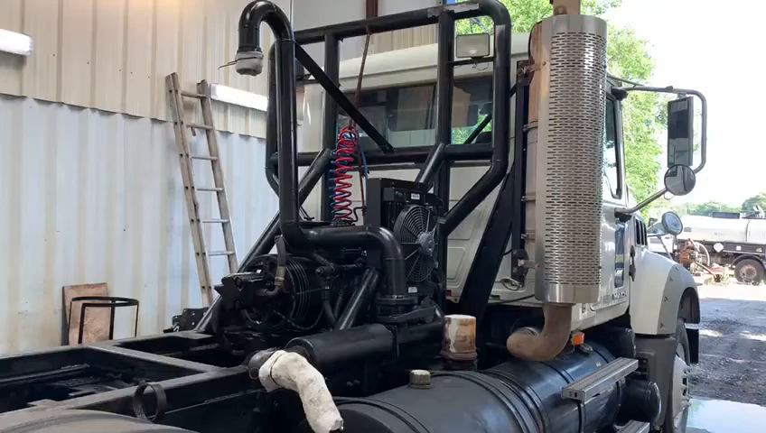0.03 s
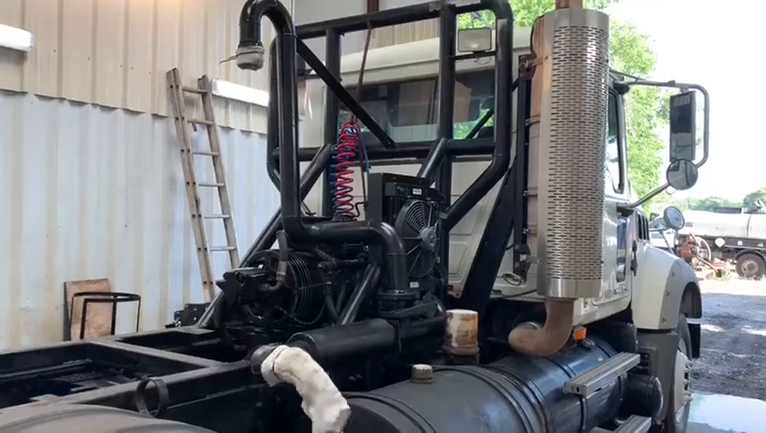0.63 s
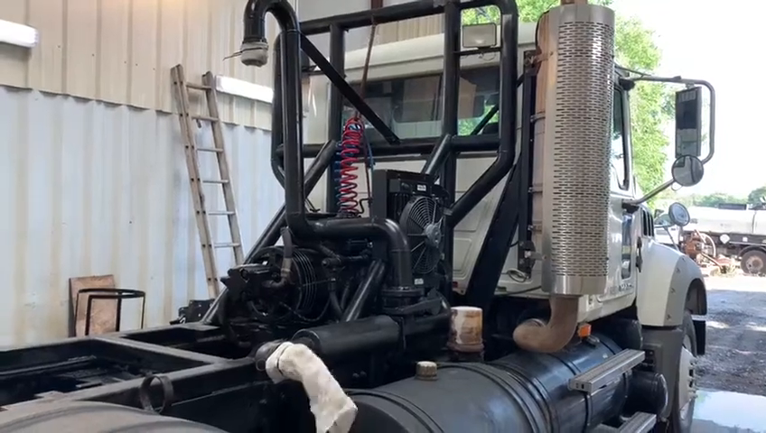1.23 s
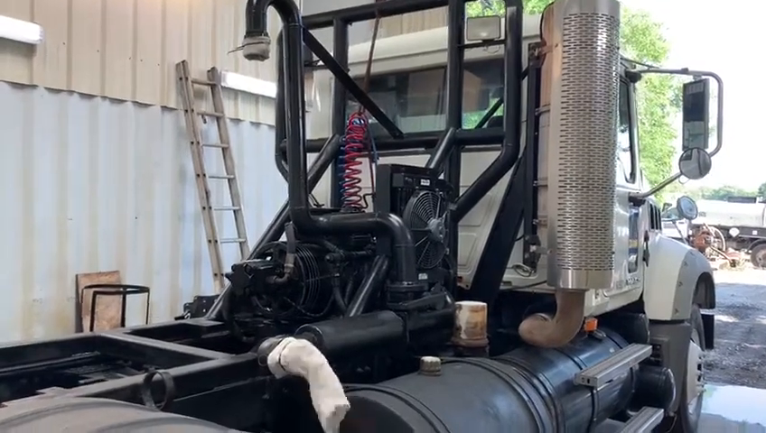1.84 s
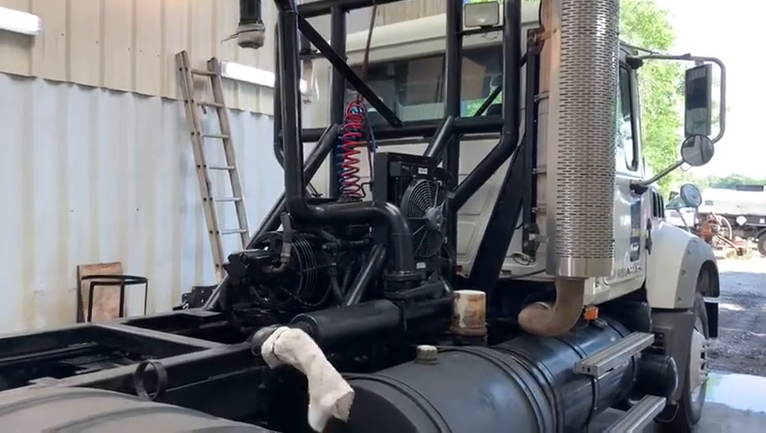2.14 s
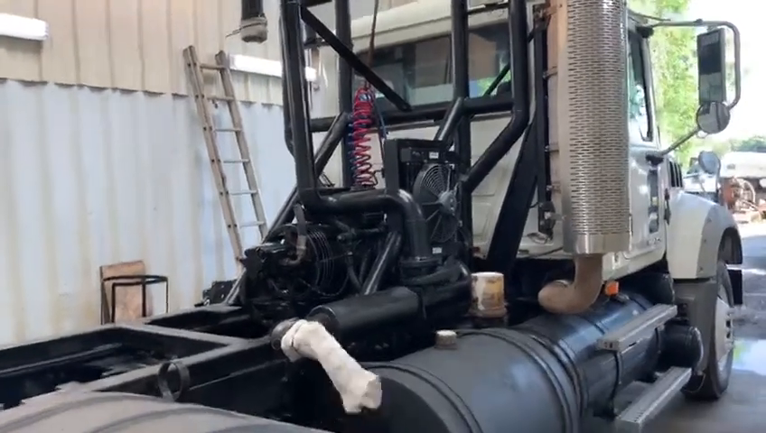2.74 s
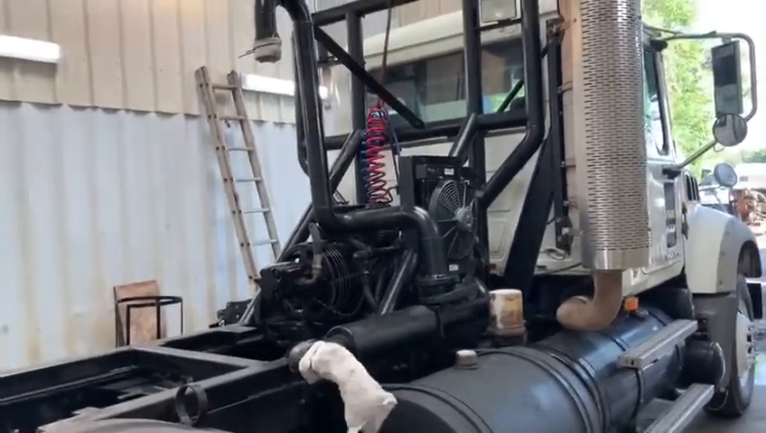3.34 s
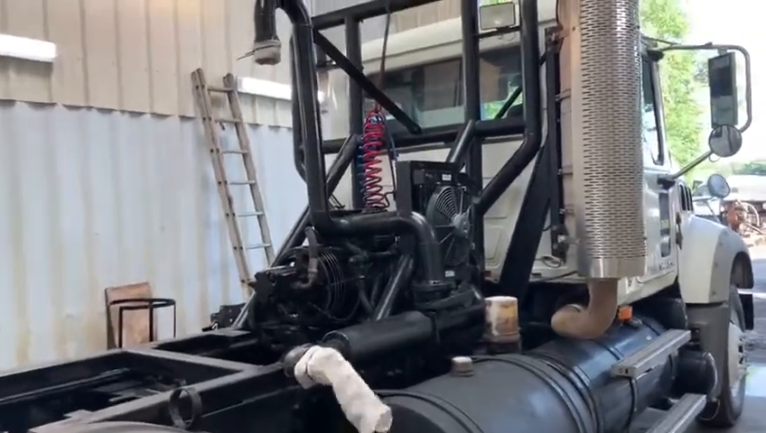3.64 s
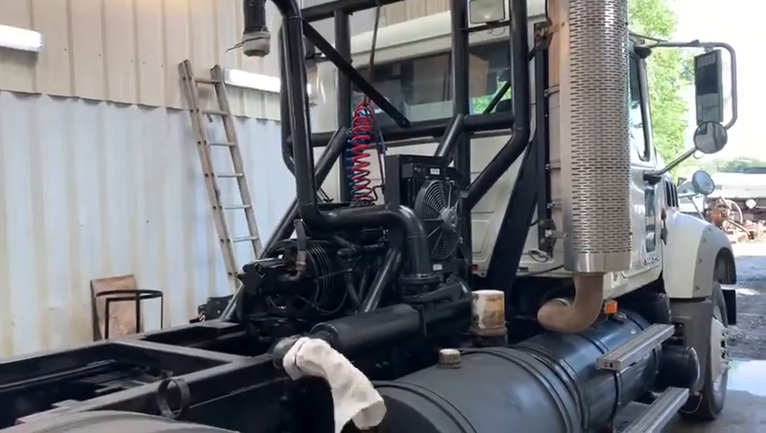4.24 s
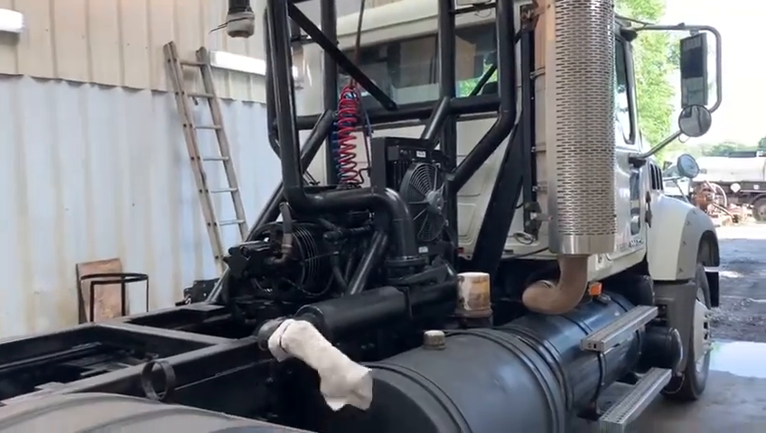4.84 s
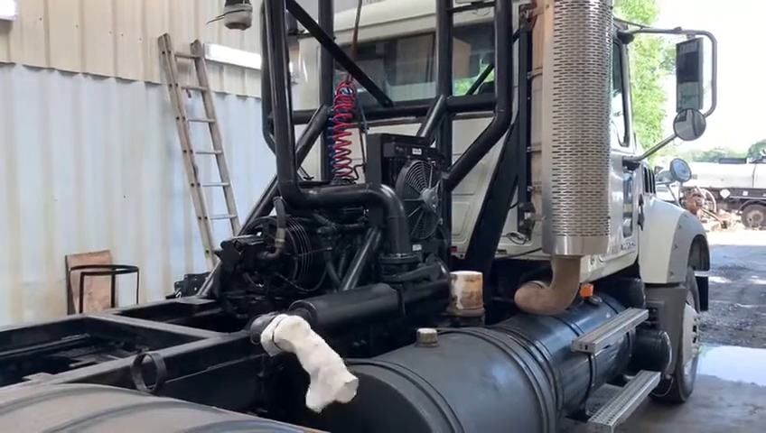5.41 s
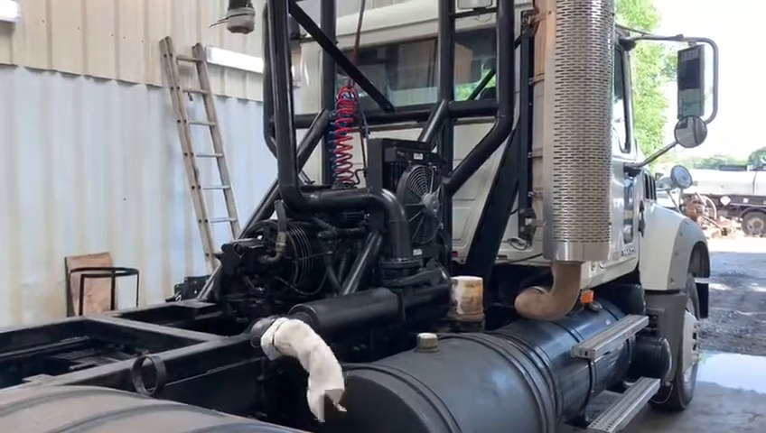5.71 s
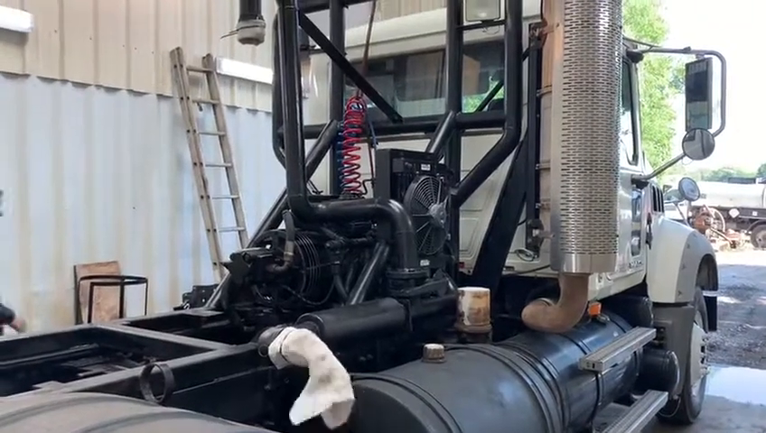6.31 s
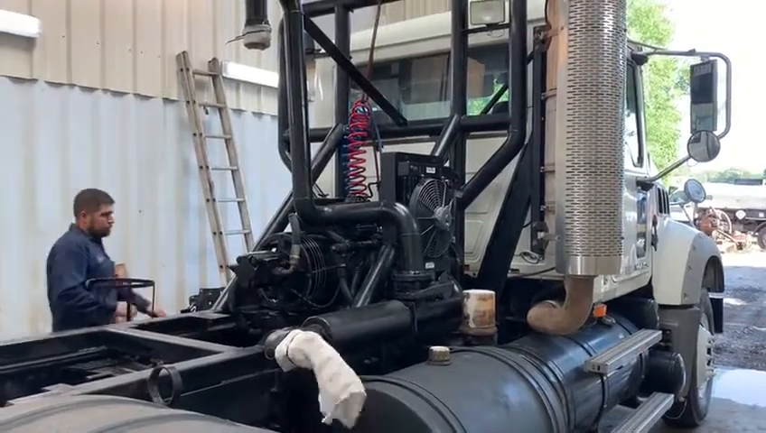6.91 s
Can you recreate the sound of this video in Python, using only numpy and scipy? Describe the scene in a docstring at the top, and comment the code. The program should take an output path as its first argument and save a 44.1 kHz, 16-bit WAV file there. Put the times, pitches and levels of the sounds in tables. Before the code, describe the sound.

A diesel engine runs fast and loud, driving a pump on a truck inside a metal-walled workshop. Its low exhaust drone wavers slightly, mixed with mechanical clatter and a steady hiss of rushing air. After about a second the drone changes colour as the load eases, and a thin high whistle winds up and holds. The load returns while the roar carries on, heard from nearby.

```python
"""A four-cylinder diesel near 2300 rpm drives a truck's vacuum pump in a metal-walled workshop.
From the start: exhaust drone, clatter and rushing air, the governor hunting about four times a second.
Near 1 s the load eases, the drone changes colour and a thin whistle winds up to hold near 6.45 kHz.
By 4 s the load is back. At 5.4 s the sound skips briefly, like a small glitch."""
import sys
import numpy as np
from scipy import signal
from scipy.fft import rfft, irfft, next_fast_len
from scipy.io import wavfile
from scipy.ndimage import uniform_filter1d, map_coordinates

SR = 44100
rng = np.random.default_rng(int(sys.argv[2]) if len(sys.argv) > 2 else 0)


def put_to_file(sound):
    """Save the sound as 16-bit audio at rate SR, in the file named by the first command-line argument."""
    columns = np.atleast_2d(sound).T  # one column per channel
    safe = np.clip(columns, -1, 1)
    whole_steps = np.round(safe * 32767)
    wavfile.write(sys.argv[1], SR, whole_steps.astype(np.int16))


N = 306936
TIME = np.arange(N) / SR

# Relative noise levels: time_s, clatter_db, air_db
NOISE_LEVELS = [(0.15, -33, -41.5), (1.0, -32, -41), (2.0, -31.5, -40.5), (3.0, -32, -40.5),
                (3.8, -32.5, -39.5), (4.8, -31.5, -39), (5.7, -31, -39.5), (6.4, -31.5, -39.5),
                (6.96, -30.5, -38.5)]


def amp(db):
    """Decibels to gain."""
    return 10 ** (np.asarray(db) / 20)


def unit(x):
    """x at rms 1."""
    return x / np.sqrt(np.mean(x ** 2) + 1e-20)


def along(points, hz):
    """Interpolate (freq_hz, value) rows on a log axis."""
    freqs_hz, values = np.transpose(points)
    return np.interp(np.log(hz + 1), np.log(freqs_hz + 1), values)


def curves(rows):
    """One per-sample curve for each column after time_s."""
    times_s, *columns = np.transpose(rows)
    return [np.interp(TIME, times_s, column) for column in columns]


def wobble(knots_per_s):
    """Smooth random curve."""
    return map_coordinates(rng.standard_normal(4096), [TIME * knots_per_s], mode="wrap")


def filtered(x, response):
    """Filter x by response(hz)."""
    size = next_fast_len(N + SR // 2)
    return irfft(rfft(x, size) * response(np.fft.rfftfreq(size, 1 / SR)), size)[..., :N]


def panned(x, pan_db):
    """Equal-power stereo, left louder by pan_db."""
    left, right = amp(pan_db / 2), amp(-pan_db / 2)
    return np.array([x * left, x * right]) / np.sqrt((left ** 2 + right ** 2) / 2)


def patchy_noise(patchy_db):
    """Two noises with random gain patches in time and frequency."""
    spectra = signal.stft(rng.standard_normal((2, N)), nperseg=512)[2]
    patches = uniform_filter1d(rng.standard_normal(spectra.shape[1:]), size=7, axis=0)
    patches = uniform_filter1d(patches, size=12, axis=1)
    return unit(signal.istft(spectra * amp(patchy_db * unit(patches)), nperseg=512)[1][:, :N])


def diffuse(pair, spectrum):
    """Two unrelated signals to a stereo field of rms 1, shaped by spectrum, rippled by near echoes."""
    # Left-right likeness: freq_hz, correlation
    likeness = [(40, .88), (250, .93), (500, .7), (900, .5), (1600, .3), (4500, .15), (5400, -.25),
                (7200, .4), (7900, .98), (8400, .7), (9300, -.99), (10200, -.99), (11100, .98)]
    # Echoes off the truck frame and near wall: delay_s, gain
    near_echoes = [(.0019, 0.14), (.0037, -0.12), (.0071, .14), (0.0123, 0.12)]

    def response(hz):
        width_rad = np.arccos(np.clip(along(likeness, hz), -1, 1)) / 2
        echoes = sum(gain * np.exp(-2j * np.pi * hz * delay_s) for delay_s, gain in near_echoes)
        ripple = 1 + echoes / (1 + (hz / 3500) ** 2)  # short waves scatter instead
        return amp(along(spectrum, hz)) * ripple * [np.cos(width_rad), np.sin(width_rad)]
    mid, side = filtered(pair, response)
    return unit(np.array([mid + side, mid - side]))


def rushing_air():
    """Steady hiss of the fan and pump outlet."""
    # Hiss spectrum: freq_hz, density_db
    spectrum = [(1500, 10), (3000, 6), (4200, 8.5), (5300, 5), (6200, 7), (6950, 6), (7300, 10.5),
                (7600, 5), (8200, 7.5), (9600, -2), (10500, 1), (11500, 2), (12200, -33)]
    hiss = diffuse(patchy_noise(patchy_db=0.9), spectrum)
    _, air_db = curves(NOISE_LEVELS)
    return hiss * amp(air_db + 6.5 + 0.89 * wobble(16))


def spool(start_hz=4660, climb_hz_per_s=1220, climb_s=1.2, settle_per_s=2.2, swing_hz=0.43):
    """Whistle pitch in Hz: the rotor climbs linearly, overshoots and settles."""
    climb_hz = start_hz + climb_hz_per_s * TIME
    hold_hz = 6444 + 2.5 * TIME
    gap_hz = start_hz + climb_hz_per_s * climb_s - hold_hz
    since_s = np.maximum(TIME - climb_s, 0)
    omega = 2 * np.pi * swing_hz
    overrun_hz = (climb_hz_per_s + settle_per_s * gap_hz) / omega
    offset_hz = gap_hz * np.cos(omega * since_s) + overrun_hz * np.sin(omega * since_s)
    return np.where(TIME < climb_s, climb_hz, hold_hz + offset_hz * np.exp(-settle_per_s * since_s))


def whistle(waver_hz=2.6, steady_echo=0.033, glide_echo=1.73, right_lead_rad=1.6):
    """Fast rotor, likely the turbo; random fading mimics wall echoes beating with it as it glides."""
    # Level at the moving listener: time_s, left_db, right_db
    ear_levels = [(0.95, -48, -35), (1.02, -50, -41), (1.15, -38, -29.5), (1.42, -39, -34),
                  (1.58, -37, -29), (1.73, -38, -35), (1.85, -40, -36), (2.0, -35, -34), (2.1, -44, -42),
                  (2.16, -46, -45), (2.21, -41, -34), (2.38, -39, -31.5), (2.45, -44, -34),
                  (2.53, -30, -28.5), (2.76, -41, -32), (2.97, -33, -30.5), (3.17, -38, -24),
                  (3.35, -42, -27), (3.43, -42, -35), (3.52, -42, -35), (3.62, -41, -27),
                  (3.92, -43, -24.5), (4.2, -33, -24), (4.48, -39, -24), (4.67, -28, -23), (4.95, -37, -24),
                  (5.12, -29, -25), (5.4, -35, -30), (5.6, -32, -25.5), (6.3, -32.5, -26.5),
                  (6.6, -30.5, -24.5), (6.96, -41, -25.7)]
    # Faint until the rotor is fast enough: pitch_hz, gain_db
    speed_gain = [(4700, -24), (5680, -9), (5810, 0), (6150, -2), (6440, -.5)]
    pitch_hz = spool()
    sweep = np.abs(np.gradient(pitch_hz))
    echo = steady_echo + glide_echo * np.sqrt(sweep / sweep.max())
    beats = np.array([wobble(42) + 1j * wobble(42) for ear in range(2)])
    fading = (1 + echo * beats) / np.sqrt(1 + 2 * echo ** 2)
    phase = 2 * np.pi * np.cumsum(pitch_hz + waver_hz * wobble(39)) / SR
    tone = np.sqrt(2) * np.real(fading * np.exp(1j * np.array([phase, phase + right_lead_rad])))
    return tone * amp(np.array(curves(ear_levels)) + along(speed_gain, pitch_hz))


def governor(hunt_hz=3.88, first_surge_s=0.252, depth_hz=0.15, unloaded_hz=75.7, load_span_hz=1.55):
    """Firing rate hunts and wanders about the set speed; load (0-1) goes with it."""
    # Governed speed as the pump load eases and returns: time_s, firing_hz
    set_speed = [(0.12, 77.1), (0.33, 77.25), (0.46, 76.9), (0.58, 77.2), (0.76, 77.3), (0.94, 76.05),
                 (1.15, 76.2), (1.3, 76.28), (1.45, 76.1), (1.82, 76.12), (2.04, 76.3), (2.18, 76.1),
                 (2.35, 75.66), (2.47, 75.82), (2.68, 76.0), (2.87, 75.94), (3.3, 76.66), (3.5, 76.72),
                 (3.79, 76.55), (3.89, 77.15), (4.12, 77.05), (4.28, 76.78), (4.65, 77.0), (4.9, 76.9),
                 (5.0, 76.7), (5.1, 76.93), (5.5, 76.82), (5.96, 77.0), (6.07, 76.72), (6.55, 76.85),
                 (6.8, 77.1), (6.96, 77.15)]
    set_hz, = curves(set_speed)
    hunt = np.cos(2 * np.pi * hunt_hz * (TIME - first_surge_s))
    firing_hz = set_hz + depth_hz * hunt + 0.0494 * wobble(14)
    return firing_hz, np.clip((firing_hz - unloaded_hz) / load_span_hz, 0, 1)


def clatter(firings, load, knock_share=0.23, cylinder_db=0.5, unloaded_db=-3.0):
    """Knocks and valve gear repeat every four firings, in combustion noise; all pulse with the pistons."""
    # Clatter spectrum: freq_hz, density_db
    spectrum = [(20, -31), (33, 2), (120, 2.5), (250, 7), (370, 7.5), (450, 2.5), (580, -2), (850, 3),
                (1050, -7.5), (1300, -1.3), (1750, -9), (2200, -7.5), (3000, -13.5), (5200, -19.5),
                (9000, -53)]
    cycles = rng.standard_normal((2, 2300))
    position = (firings / 4 % 1) * cycles.shape[1] + 3 * wobble(60)
    knocks = np.array([map_coordinates(cycle, [position], mode="grid-wrap") for cycle in cycles])
    combustion = patchy_noise(patchy_db=2.0)
    mix = np.sqrt(knock_share) * knocks + np.sqrt(1 - knock_share) * combustion
    imbalance = np.array([1, -1, 0.5, -0.5])[firings.astype(int) % 4]
    angle = 2 * np.pi * firings
    pulsing = (1 + 0.062 * np.cos(angle) - 0.087 * np.cos(2 * angle)) * amp(cylinder_db * imbalance)
    body = diffuse(mix * pulsing, spectrum)
    # The lows swell slowly with load.
    slow_load = uniform_filter1d(load, size=SR // 2)
    lows = filtered(body, lambda hz: 1 / (1 + (hz / 950) ** 4))
    body += lows * (amp(unloaded_db * (1 - slow_load)) - 1)
    clatter_db, _ = curves(NOISE_LEVELS)
    return body * amp(clatter_db + 8.5 + 0.12 * wobble(17))


def exhaust(firings, load, nominal_hz=77.1, skip_s=5.425, dispersion_rad=0.85):
    """Drone of firing-rate orders; load shifts their levels, and high orders flutter more."""
    # Unloaded to full: load_fraction
    load_steps = [0, .13, .42, .61, 1]
    # Drone partials: order, level_db at each of five load steps, drift_db_per_s as the listener moves
    partials = [(1, -28.5, -27.5, -26, -27, -24.5, 0.5), (2, -31, -27.5, -27.5, -26.5, -23, 0.49),
                (2.5, -51, -52, -56, -36.5, -34.5, 0.28), (3, -21, -19.5, -19.5, -19.5, -21, 0.087),
                (4, -16.5, -17.5, -20.5, -29.5, -28, 0.56), (5, -29, -23, -20, -18.5, -21, 0.27),
                (6, -34, -33, -46, -40, -28, -.2), (7, -44, -50, -40, -40.5, -32.5, 0.36),
                (8, -37.5, -49, -54, -41.5, -39, 0.39), (9, -44, -52, -64, -48.5, -35, 0.076),
                (10, -49, -41.5, -36.5, -37.5, -40, 0.00075), (11, -55, -46, -43, -37, -29.5, 0.56),
                (16, -46, -45, -55, -42, -56, 0), (17, -52, -51, -42, -44.5, -55, 0.18),
                (18, -41, -50, -47, -48, -42, 0.085)]
    # Standing waves favour one ear: freq_hz, left_over_right_db
    balance = [(230, -.5), (310, 0), (385, 4.5), (460, 0), (540, 2.4), (700, -.5), (850, 2.7)]
    # They also shift phase between the ears: freq_hz, left_lead_rad
    phase_lead = [(77, .14), (154, 0), (305, 0), (385, -.35), (460, 0), (540, -.3), (615, .55), (700, -.3),
                  (850, -.55)]
    drone = np.zeros((2, N))
    skipped = np.clip((TIME - skip_s) / 0.014 + 0.5, 0, 1)
    for order, *levels_db, drift_db_per_s in partials:
        level_db = np.interp(load, load_steps, levels_db) + drift_db_per_s * (TIME - TIME.mean())
        level_db += 0.26 * np.sqrt(order) * wobble(16)
        jitter_rad = 0.003 * order ** 1.5 * wobble(30)
        skip_cycles = (0.5 - 0.22 * order) % 1 - 0.5
        muffler_rad = dispersion_rad * order ** 2  # smears each puff into a downward chirp
        phase = 2 * np.pi * (order * firings + skip_cycles * skipped) + muffler_rad + jitter_rad
        pitch_hz = order * nominal_hz
        shift_rad = along(phase_lead, pitch_hz) / 2
        gains = panned(np.sqrt(2) * amp(level_db), along(balance, pitch_hz))
        drone -= gains * np.cos([phase + shift_rad, phase - shift_rad])
    return drone


def scene():
    """One crankshaft drives drone and clatter; air and whistle lie over them."""
    firing_hz, load = governor()
    firings = np.cumsum(firing_hz + 0.073 * wobble(24.76)) / SR
    leftward = amp([[0.4], [-0.4]])
    return exhaust(firings, load) + leftward * clatter(firings, load) + rushing_air() + whistle()


def record(dry, start_s=0.12, fade_s=0.003, top_hz=11900):
    """Fast fade-in, then a brick-wall low-pass."""
    fade_in = np.clip((TIME - start_s) / fade_s, 0, 1)
    return filtered(dry * fade_in, lambda hz: hz < top_hz)


dry = scene()
out = record(dry)
put_to_file(out)
```